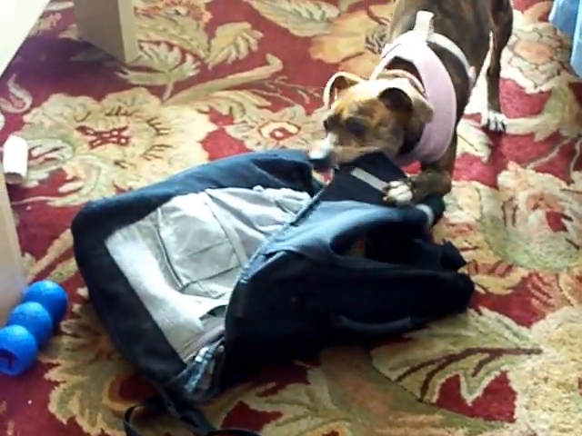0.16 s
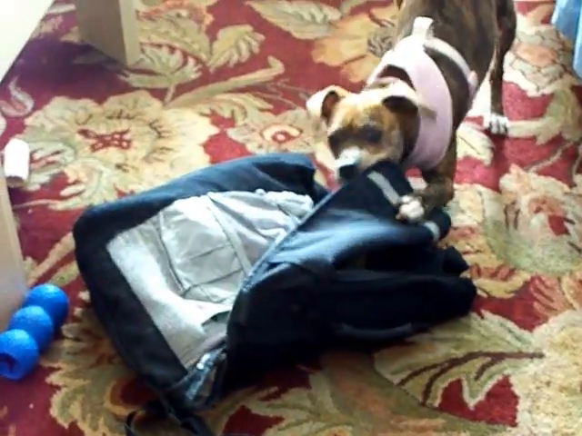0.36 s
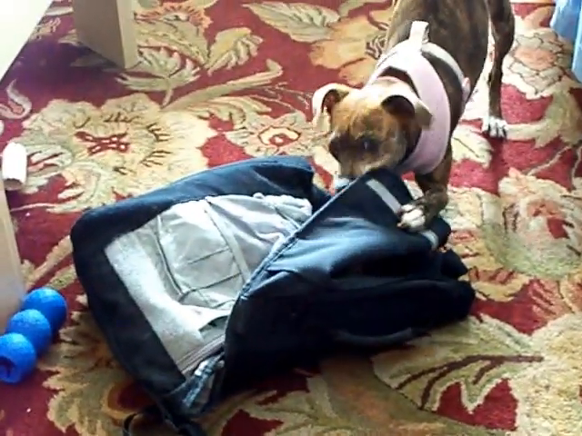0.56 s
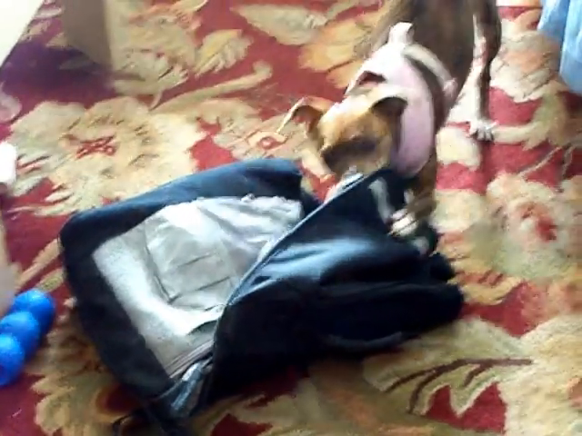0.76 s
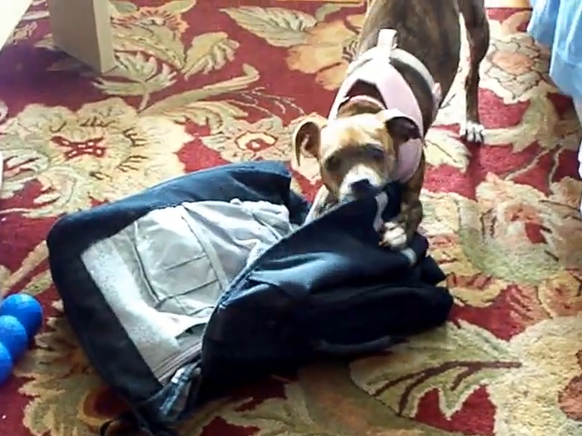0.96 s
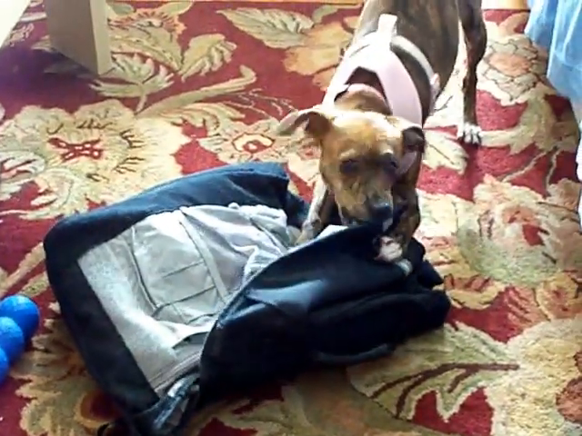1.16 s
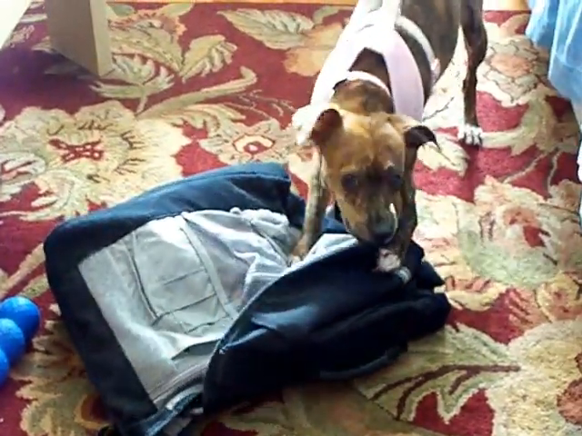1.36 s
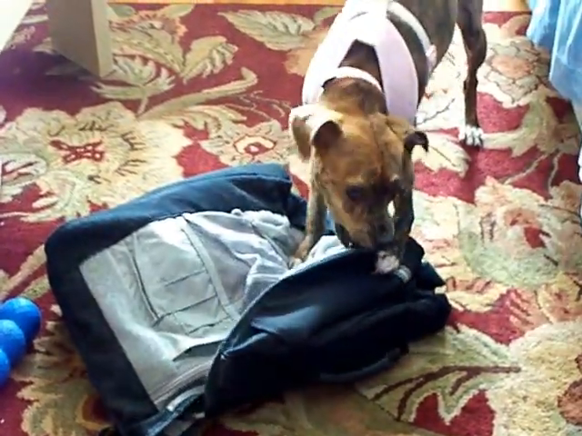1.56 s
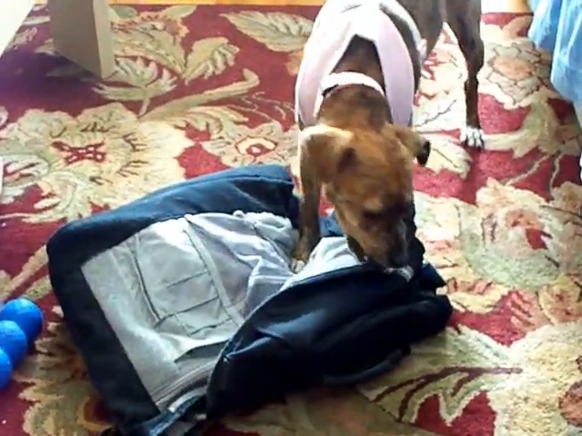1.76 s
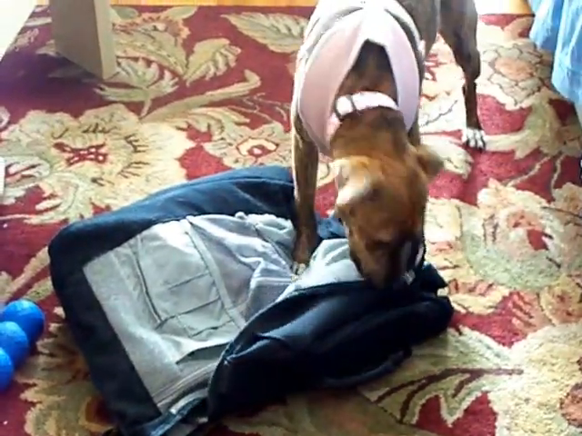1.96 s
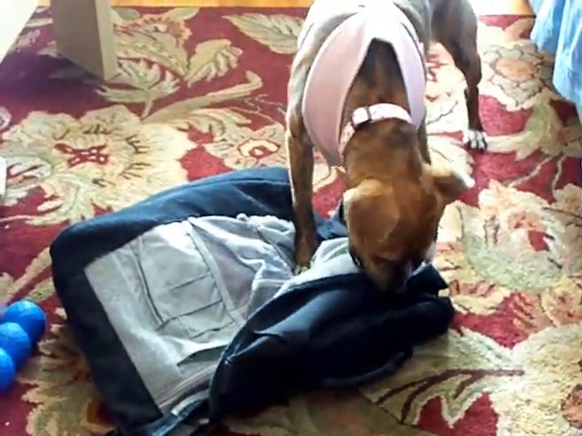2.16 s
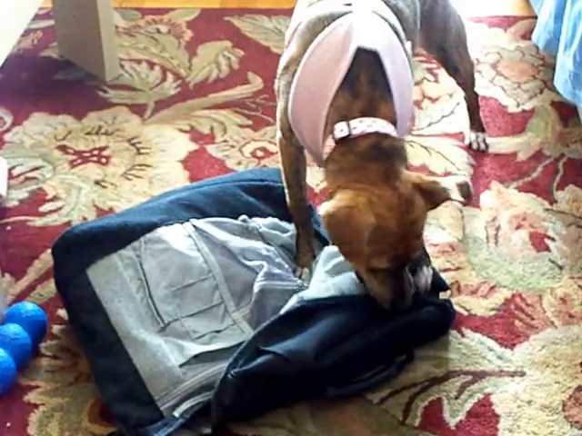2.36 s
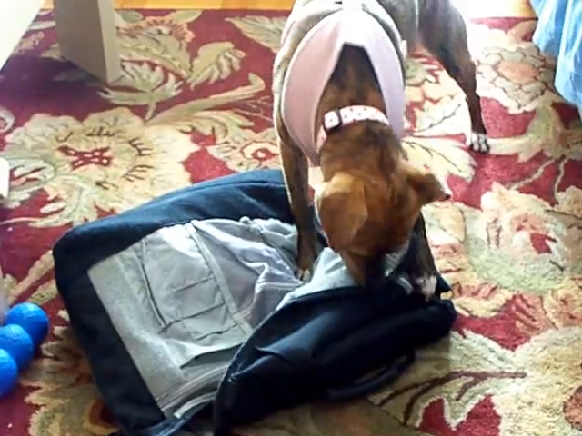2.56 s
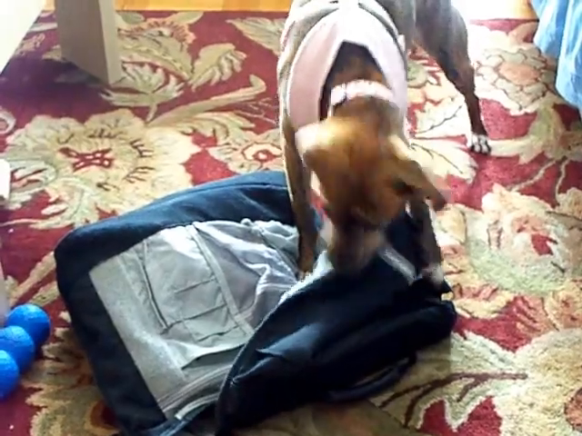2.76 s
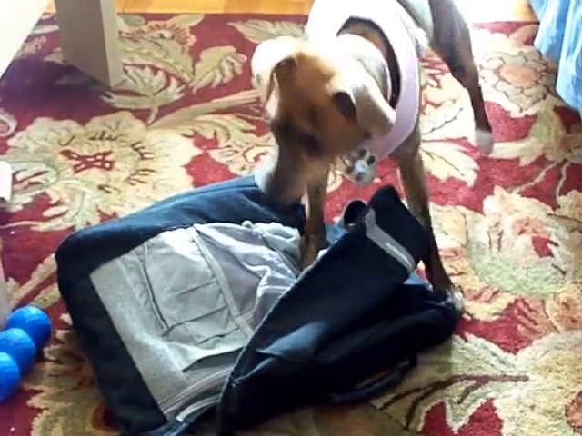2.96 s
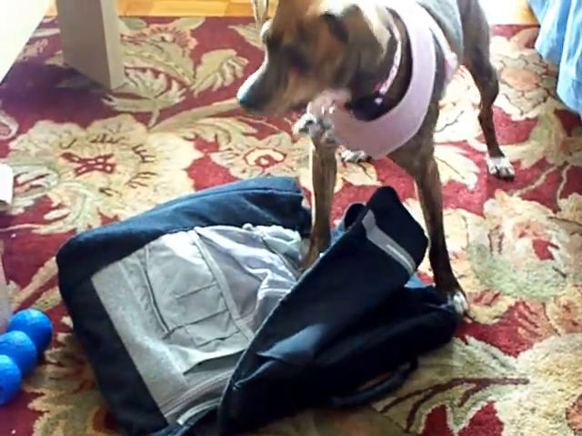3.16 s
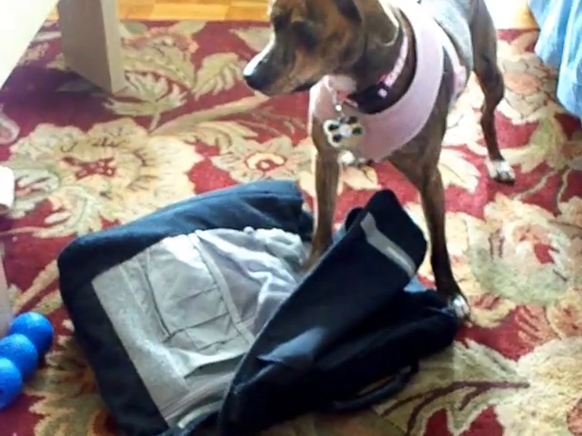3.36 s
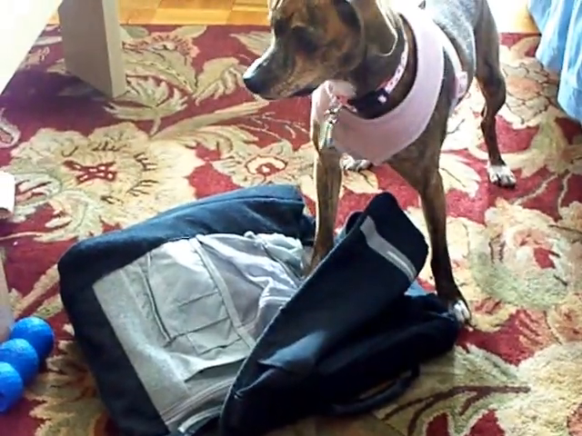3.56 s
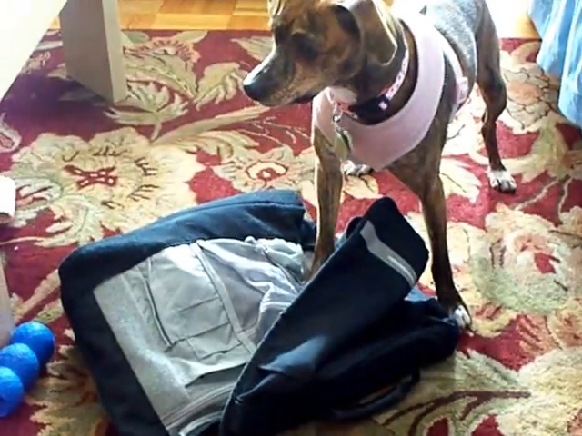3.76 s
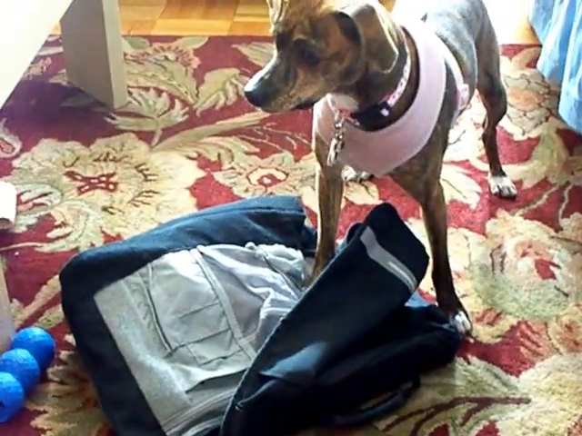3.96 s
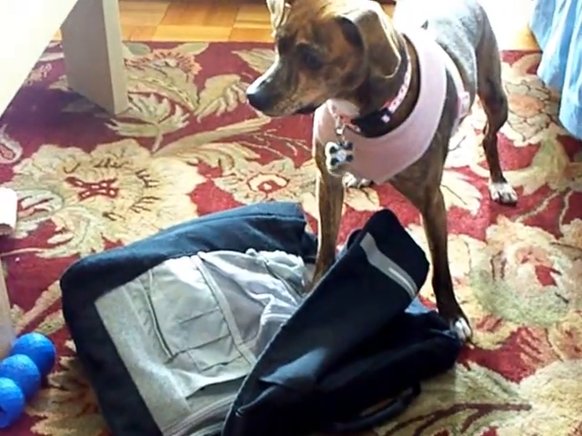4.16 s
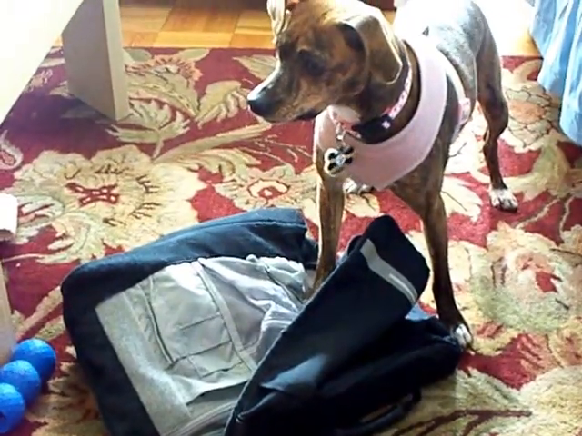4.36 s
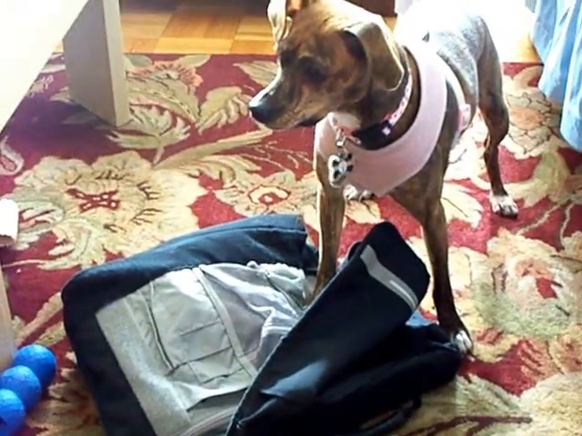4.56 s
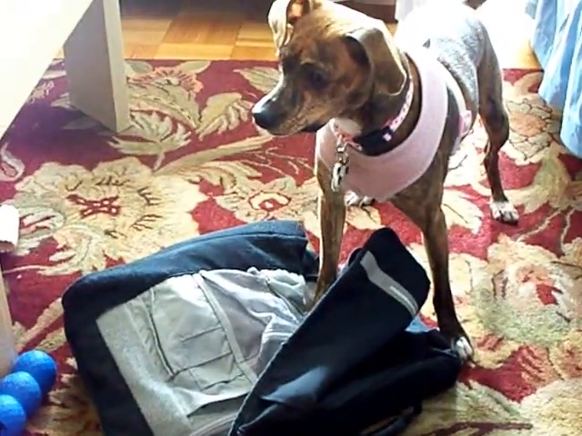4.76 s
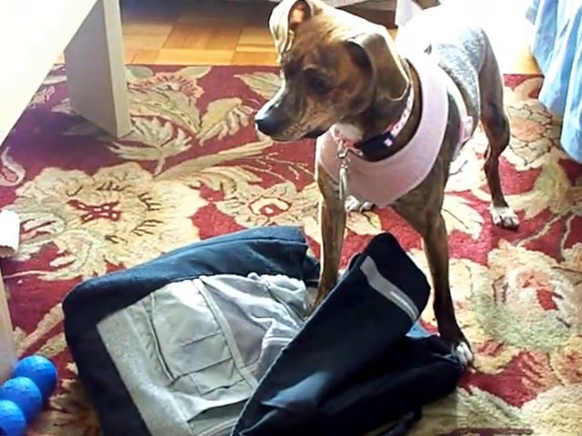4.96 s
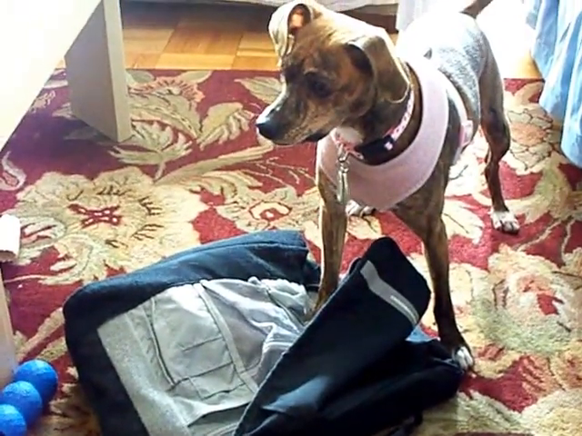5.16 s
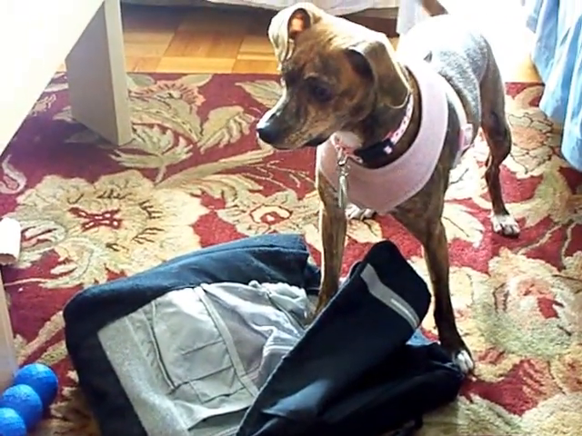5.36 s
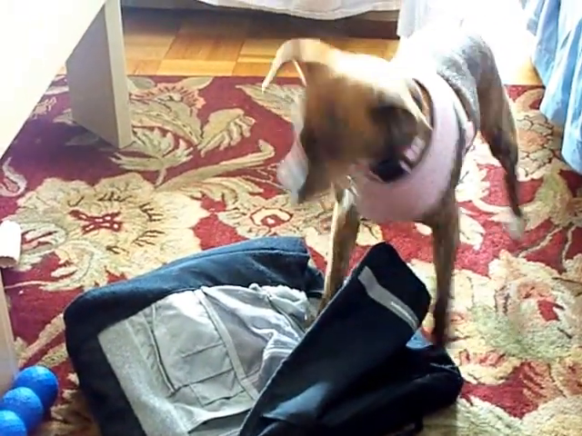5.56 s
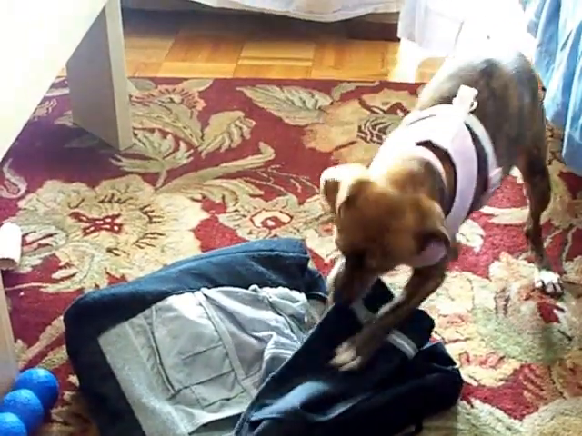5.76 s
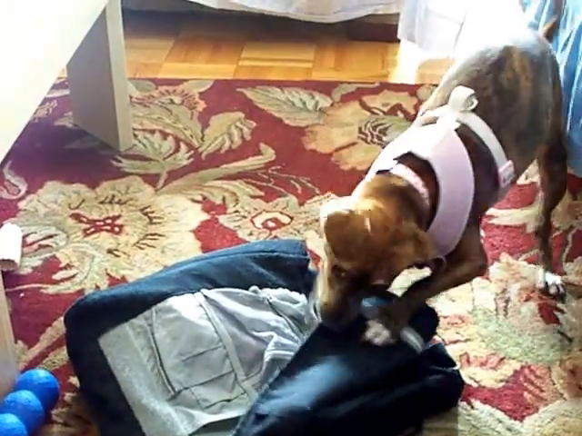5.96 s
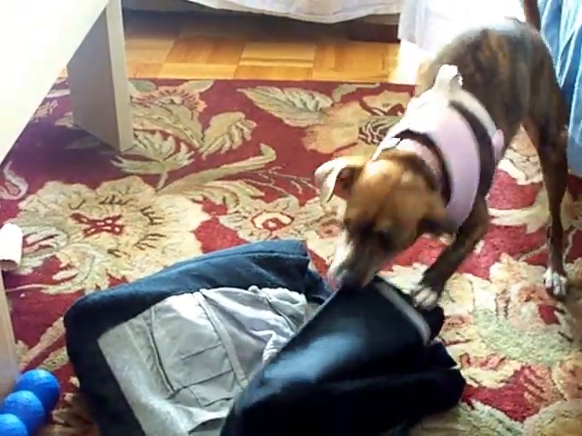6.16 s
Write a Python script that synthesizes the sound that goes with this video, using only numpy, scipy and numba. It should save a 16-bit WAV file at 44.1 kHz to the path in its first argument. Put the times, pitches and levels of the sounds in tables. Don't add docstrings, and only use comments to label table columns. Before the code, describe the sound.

Close to a cheap pocket camera in a small room, a dog nibbles and paws a nylon bag on carpet, with crackling cloth, clicking tags, knocking claws and soft thuds. Midway a door further behind groans and leaps into high squeals, pauses, then closes in short squeaks and a sinking creak. A hard tug and ringing buckle end it over hiss and low thumping.

```python
import sys
import numpy as np
from scipy import signal
from scipy.fft import rfft, irfft, next_fast_len
from scipy.io import wavfile
from scipy.ndimage import uniform_filter1d
from numba import njit

SR = 44100
rng = np.random.default_rng(int(sys.argv[2]) if len(sys.argv) > 2 else 0)


def ratio(d):
    e = np.asarray(d, float) / 20
    return 10 ** e


def generate_wav(sig):
    pcm = np.round(np.clip(np.atleast_2d(sig).T, -1, 1) * 32767).astype(np.int16)
    wavfile.write(sys.argv[1], SR, pcm)


N = 273887
HALF_RATE_HZ = 8000
SETTLE_S = 0.012

# (centre [Hz], width [Hz], level [dB])
DULL_RUB = [(252, 260, 7), (405, 290, 12.5), (710, 396, 10), (914.4, 210, -5.5)]
RUSTLE = [(1460, 1000, 11.8), (1900, 570, 5.2), (2840, 2080, 9.9)]
BRIGHT_CRACKLE = [(5280, 2650, 4), (7200, 2200, 5.5), (7400, 2100, 0)]
# (frequency [Hz], gain [dB])
INLET = [(2500, -1), (3300, -5.5), (3900, -13), (4120, -26), (4230, -29.5), (4400, -16.5), (4700, -9.5),
         (5200, -3.5), (6500, 1.5)]


def unit(x):
    return x / np.sqrt(np.mean(x ** 2) + 1e-30)


def shape_db(points, hz):
    point_hz, point_db = np.array(points).T
    return np.interp(np.log(np.maximum(hz, 1)), np.log(point_hz), point_db)


def colour(x, points):
    size = next_fast_len(len(x))
    hz = np.arange(size // 2 + 1) * SR / size
    return irfft(rfft(x, size) * ratio(shape_db(points, hz)), size)[:len(x)]


def band(hz, centre_hz, width_hz):
    return 1 / (1 + ((hz - centre_hz ** 2 / hz) / width_hz) ** 2) ** 2


def body(x, modes):
    size = next_fast_len(len(x))
    hz = np.arange(1, size // 2 + 2) * SR / size
    power = sum(ratio(db) ** 2 * band(hz, centre_hz, width_hz) for centre_hz, width_hz, db in modes)
    gain = np.sqrt(power) * ratio(shape_db(INLET, hz))
    return unit(irfft(rfft(x, size) * gain, size)[:len(x)])


def walk(rate_hz, size=N):
    hold = int(SR / rate_hz)
    steps = np.repeat(rng.standard_normal(size // hold + 1), hold)
    return 1.41 * uniform_filter1d(uniform_filter1d(steps, hold), hold)[:size]


def ring(hz, t60_s, size):
    t = np.arange(size) / SR
    return np.sin(2 * np.pi * hz * t) * 1000. ** (-t / t60_s) * (1 - np.exp(-t / 0.00079))


def add(out, s, x):
    i = int(s * SR)
    out[i:i + len(x)] += x[:N - i]


def cloth():
    # (time [s], length [s], rustle level [dB], crackle over rustle [dB])
    nibbles = [(0.331, 0.03, -65, -4), (1.11, 0.14, -56.5, -6), (1.316, 0.046, -52.5, -3),
               (1.725, 0.04, -49, 2), (1.784, 0.1, -64, 7), (1.94, 0.096, -58.5, -4),
               (2.04, 0.037, -53, -1.5), (2.228, 0.1, -54.5, -5.5), (3.032, 0.012, -57.5, -3),
               (3.12, 0.049, -53, -5.5), (3.207, 0.031, -53, -4.5), (3.322, 0.018, -57.5, -1)]
    paws = [(0.05, 0.094, -63, -7), (1.393, 0.044, -55, -4.5), (1.459, 0.051, -51.5, -4),
            (1.548, 0.13, -63, -6), (2.297, 0.035, -53, 2), (2.404, 0.038, -49.5, 10.5),
            (2.459, 0.051, -61, 5), (2.522, 0.086, -65, 1.5), (2.65, 0.11, -52, 3.5),
            (2.931, 0.088, -60, -3), (3.081, 0.022, -56.5, 1), (3.703, 0.012, -55, -7.5),
            (5.558, 0.064, -64, -3.5), (5.618, 0.006, -58.5, 7), (5.654, 0.051, -46.5, -6.5),
            (5.823, 0.22, -54, 3), (6.155, 0.049, -48.5, -6.5)]
    drags = [(0.186, 0.13, -69, -1.5), (0.544, 0.099, -70, 0), (2.096, 0.12, -69, -1.5),
             (3.388, 0.025, -57, -22), (3.542, 0.058, -58.5, -4.5), (3.616, 0.096, -71.5, -15),
             (3.758, 0.09, -70.5, -3), (4.273, 0.082, -67, -32), (1.47, 0.045, -64, -8),
             (5.991, 0.038, -47, -8), (6.053, 0.11, -51, -0.3)]
    pulls = [
        (0.913, 0.096, -64.5, -6.5),
        (1.013, 0.08, -65.5, -7.5),
        (1.855, 0.16, -62, 8),
        (2.33, 0.07, -53.5, 3),
        (5.731, 0.075, -49.5, 4.5),
    ]
    # (dull rub over rustle [dB], swell over the stroke [dB])
    kinds = [(nibbles, (-10.5, 0.1)), (paws, (0.9, -1.7)), (drags, (8.1, -3.1)), (pulls, (-1, 7.3))]
    tail_s = 0.098

    clicks = (rng.random(N) < 3000 / SR) * rng.standard_normal(N)
    clicks *= ratio(2.2 * rng.exponential(size=N))
    drive = ratio(1.2 * walk(90)) * (unit(clicks) + rng.standard_normal(N))
    rustle = unit(sum(ratio(mode[2] + 3 * walk(30)) * body(drive, [mode]) for mode in RUSTLE))
    rub = body(drive, DULL_RUB) * ratio(1.5 * walk(40))
    crackle = body(drive, BRIGHT_CRACKLE) * ratio(1.5 * walk(40))

    power = np.zeros((3, N))
    strokes = [tuple(row) + kind for rows, kind in kinds for row in rows]
    for s, length_s, db, crackle_db, rub_db, swell_db in strokes:
        end_s = length_s + tail_s
        t = np.arange(int(end_s * SR)) / SR
        stroke_db = np.interp(t, [0, .005, length_s, end_s], [-30, -swell_db / 2, swell_db / 2, -30])
        for layer, relative_db in zip(power, (0, rub_db, crackle_db)):
            add(layer, s, ratio(db + relative_db + stroke_db) ** 2)
    return np.sum(np.sqrt(power) * [rustle, rub, crackle], axis=0)


def hits():
    # (time [s], peak [dB], ring [Hz], crack over ring [dB])
    clicks = [(0.411, -49, 900, -3), (0.573, -49.5, 1560, -3.5), (1.124, -41, 1580, -7),
              (1.157, -38, 1600, -0.5), (1.337, -36.5, 1240, -3.5), (1.429, -34.5, 1150, -7),
              (1.891, -53.5, 1265, 5), (1.905, -46.5, 2590, 10), (1.936, -33, 1760, 1.5),
              (2.238, -42, 1840, -0.5), (2.266, -35, 1760, -4.5), (2.257, -51, 1900, 6.5),
              (2.367, -44, 1800, 10.5), (2.383, -45.5, 2400, 9.5), (2.419, -43.5, 2180, 8),
              (2.445, -38, 2680, 3), (3.025, -45, 1830, 1.5), (3.08, -42, 2330, 0.6), (3.14, -49, 1240, 1),
              (5.067, -38, 1820, 0.5), (5.087, -44, 1980, 6.5), (5.624, -45.5, 2420, 9),
              (5.733, -39.5, 2130, 10.5), (1.878, -48, 1820, 5.5)]
    knocks = [(0.071, -37, 1270, -14), (0.204, -39.5, 988, -12), (0.26, -38, 1520, -19),
              (0.274, -38.5, 1470, -23), (0.401, -28.5, 1330, -39), (0.602, -44, 1360, -18),
              (0.937, -40, 1280, -22), (1.008, -37, 1500, -9.5), (1.666, -42.5, 1110, -29),
              (1.733, -48.5, 1420, -29.5), (2.299, -25.5, 1030, -21), (3.208, -36.5, 1200, -14),
              (3.326, -38, 1269, -11), (3.403, -35, 1326, -30), (3.702, -32.5, 1150, -20),
              (5.299, -33, 1490, -11), (5.666, -30.5, 1720, -7), (5.675, -21, 1590, -7.5),
              (5.686, -35, 1520, -11), (5.806, -28.5, 1670, -12.5)]
    thuds = [
        (0.349, -44.5, 1240, -8.5),
        (1.055, -41.5, 1240, -12.5),
        (2.163, -43, 1780, -25),
        (2.408, -33.5, 1760, -9),
        (3.543, -44.5, 1230, -6),
        (4.3, -46.5, 880, -32),
        (5.65, -37.5, 900, -14),
        (5.679, -29.5, 1500, -25),
        (6.206, -35, 980, -9.5),
    ]
    buckles = [
        (0.701, -38, 1176, -25.5),
        (1.324, -39, 1370, -7),
        (2.039, -44, 1750, -4),
        (2.939, -44, 1600, -17),
        (5.992, -27, 2050, -25),
        (6.019, -25, 2020, -17),
        (6.149, -36, 1610, -4.5),
    ]
    # (thud over ring [dB], decay t60 [s])
    kinds = [(clicks, (-32, 0.025)), (knocks, (-29.5, 0.019)), (thuds, (-2, 0.029)), (buckles, (-15.5, 0.053))]

    out, size = np.zeros(N), SR // 8
    t = np.arange(size) / SR
    blows = [tuple(row) + kind for rows, kind in kinds for row in rows]
    for s, db, hz, crack_db, thud_db, t60_s in blows:
        noise = rng.standard_normal(size)
        fade = 1000. ** (-t / t60_s)
        neighbour_hz = 1.5 * hz
        knock = 0.91 * ring(hz, 0.77 * t60_s, size)
        knock += 0.41 * ratio(shape_db(INLET, neighbour_hz)) * ring(neighbour_hz, 0.83 * t60_s, size)
        knock += 0.16 * body(noise, RUSTLE) * fade
        crack = 0.84 * body(noise, BRIGHT_CRACKLE) * fade ** 1.9
        thud = ring(287, 0.045, size) + 0.65 * ring(540, 0.02, size)
        add(out, s, ratio(db) * (knock + ratio(crack_db) * crack + ratio(thud_db) * thud))
    return out


def hinge(squeals, grip):
    # (frequency [Hz], gain [dB])
    panel = [(600, 3), (1200, -2.5), (1800, 0.5), (2600, 1.5), (3200, 2), (5000, 1), (7000, 0.6)]
    uneven, second_db, fall_db, follow, scrape_db = grip
    flutter_db = 1.23 + 80 * uneven
    out = np.zeros(N)
    for rows in squeals:
        s, hz, db = np.transpose(rows)
        t = np.arange(s[0], s[-1], 1 / SR)
        hz, db = np.interp(t, s, hz), np.interp(t, s, db)
        peak_db = db.max()
        waver = uneven + 0.0082 * np.exp(-(t - s[0]) / SETTLE_S)
        phase = 2 * np.pi * np.cumsum(hz * (1 + waver * walk(300, len(t)))) / SR

        overtone_db = peak_db + follow * (db - peak_db) + second_db
        partials = [db] + [overtone_db + fall_db * k for k in range(11)]
        tone = np.zeros(len(t))
        for k, partial_db in enumerate(partials, 1):
            heard_db = partial_db + shape_db(INLET, k * hz) + shape_db(panel, k * hz)
            level = np.sqrt(2) * ratio(heard_db + flutter_db * walk(123.3, len(t)))
            tone += level * np.sin(k * phase) * (k * hz < HALF_RATE_HZ)

        gated_noise = (1 + np.cos(phase)) * rng.standard_normal(len(t))
        scrape = body(gated_noise, DULL_RUB + RUSTLE + BRIGHT_CRACKLE)
        scrape *= ratio(scrape_db + (db + peak_db) / 2)
        edge = np.minimum(np.minimum(t - s[0], s[-1] - t) / 0.00089, 1)
        add(out, s[0], edge * (tone + scrape))
    return out


def jerks(rows, fade_db_s):
    catch_s = 0.004
    for s, length_s, first_hz, settled_hz, db in rows:
        t = np.arange(0, length_s, .001)
        hz = settled_hz + (first_hz - settled_hz) * np.exp(-t / SETTLE_S)
        drop_db = np.maximum(6 * (1 - t / catch_s), fade_db_s * (t - catch_s))
        yield np.c_[s + t, hz, db - drop_db]


def door():
    # (time [s], slip rate [Hz], level [dB])
    groan = [
        (2.603, 627, -63),
        (2.62, 674, -52),
        (2.67, 675, -50),
        (2.7, 672, -55),
        (2.735, 722, -55),
    ]
    squeals = [
        [(2.735, 2660, -39), (2.77, 2677, -47.5), (2.795, 2905, -40.5)],
        [(2.795, 3425, -49), (2.81, 3422, -43.5), (2.822, 3620, -38)],
    ]
    whistles = [
        [(2.822, 3670, -42), (2.87, 3790, -42.5), (2.9, 3747, -38.5), (2.94, 3810, -47), (2.96, 3800, -62),
         (3.015, 3860, -50.5)],
        [(3.018, 4020, -52.5), (3.04, 3906, -48), (3.09, 3863, -38), (3.16, 3890, -50), (3.21, 3823, -44.5),
         (3.26, 3874, -53), (3.35, 4010, -54.5), (3.42, 4010, -61), (3.48, 4030, -69)],
    ]
    lower_squeals = [
        [(2.72, 3030, -56), (2.75, 2960, -43), (2.78, 2946, -60.5), (2.805, 2944, -33.5), (2.83, 3260, -60)],
        [(3.155, 1136, -48.5), (3.18, 1157, -38), (3.197, 1214, -42.5), (3.225, 1191, -35.5),
         (3.3, 1221, -44.5), (3.33, 1259, -40), (3.398, 1240, -57)],
    ]
    # (time [s], length [s], first slip rate [Hz], settled slip rate [Hz], level [dB])
    squeaks = [
        (4.25, .08, 1930, 2190, -53),
        (4.45, .08, 3540, 3680, -58.5),
        (4.897, .02, 2490, 1980, -50),
        (5.072, 0.059, 1884, 2086, -48),
    ]
    chirps = [
        (4.545, 0.034, 3376, 3320, -45),
        (4.748, 0.2, 2945, 2505, -43.5),
    ]
    whine_jerk = [
        (4.915, .153, 1977, 1705, -47),
    ]
    last_jerk = [
        (5.213, 0.13, 1660, 1598, -55),
    ]
    # (time [s], slip rate [Hz], level [dB])
    slide = [
        (5.11, 2030, -50),
        (5.142, 1944, -64.5),
        (5.21, 1820, -54),
    ]
    last_swing = [
        (5.3, 1480, -51),
        (5.35, 1252, -49),
        (5.39, 1144, -52.5),
        (5.425, 944, -53),
        (5.475, 725, -60.5),
        (5.51, 628, -66.5),
    ]
    # (unevenness of the slips [ratio], second partial [dB],
    # fall of each further partial [dB], share of level swings the overtones follow [ratio], scrape [dB])
    grips = dict(groan=(0.0216, -1.5, -0.77, -0.4, 4.5), squeal=(0.0135, -9, -21, 0.8, -12),
             whistle=(0.0063, -10, -20, 1.4, -24), lower=(0.0076, -18, -25, 1.2, -46),
             squeak=(0.0172, -12.5, -11.5, 0.7, -21), chirp=(0.0078, -9, -6, 0.3, -29),
             whine=(0.011, 1.6, -4.5, 0.7, -20.5), last=(0.0044, 7, -7.5, 0.2, -13.5),
             swing=(0.0216, 1.5, -3.5, 1.5, -5.5))

    opening = hinge([groan], grips["groan"]) + hinge(squeals, grips["squeal"])
    opening += hinge(whistles, grips["whistle"]) + hinge(lower_squeals, grips["lower"])
    closing = hinge([*jerks(squeaks, 201), slide], grips["squeak"])
    closing += hinge(jerks(chirps, 292), grips["chirp"])
    closing += hinge(jerks(whine_jerk, 15), grips["whine"])
    closing += hinge(jerks(last_jerk, 15), grips["last"])
    closing += hinge([last_swing], grips["swing"])
    return opening + closing


@njit
def walls(x, lags, gain, damp):
    line, soft, out = np.zeros((8, 4096)), np.zeros(8), np.zeros(len(x))
    for i in range(len(x)):
        total = 0.
        for k in range(8):
            soft[k] += (1 - damp) * (gain[k] * line[k, (i - lags[k]) & 4095] - soft[k])
            total += soft[k]
        out[i] = soft[0] - soft[1] + soft[2] - soft[3] + soft[4] - soft[5]
        for k in range(8):
            line[k, i & 4095] = x[i] + soft[k] - total / 4
    return out


def room(bag, far_door):
    t60_s, bag_db, door_db = 0.43, -19, -9.5
    lags = np.array([613, 797, 1021, 1213, 1471, 1709, 1979, 2311])
    sent = ratio(bag_db) * bag + ratio(door_db) * far_door + 1e-18
    return walls(sent, lags, ratio(-60 * lags / SR / t60_s), .38)


def camera():
    # (frequency [Hz], density [dB per Hz])
    hiss_shape = [(25, -17.5), (40, -21), (80, -4.5), (150, -7.5), (290, 2), (480, -1.5), (850, -4),
                  (1300, -7), (2400, -13.5), (3400, -15), (5500, -17.5), (8000, -20.5)]
    # (frequency [Hz], rms level [dB])
    whine = [(59.2, -77), (7828, -73)]
    # (offset [s], ring [Hz], decay t60 [s], peak [dB])
    thumps = [
        (.0593, 261.5, 0.028, -43.5),
        (0.0926, 228, 0.026, -44.5),
    ]
    # (time [s], shift [s])
    clock_slips = [
        (5.0, -.016),
        (5.3, -0.0074),
    ]

    hiss = unit(colour(colour(rng.standard_normal(N), hiss_shape), INLET))
    out = hiss * ratio(-58 + walk(8))
    t = np.arange(N) / SR
    for hz, db in whine:
        out += np.sqrt(2) * ratio(db + 0.5 * walk(6.6)) * np.sin(2 * np.pi * hz * t)
    ticks = np.arange(int(N / SR * 10)) / 10
    for offset_s, hz, t60_s, db in thumps:
        for tick in ticks:
            late, strength, pitch = rng.standard_normal(3)
            s = tick + offset_s
            s += sum(shift_s for at, shift_s in clock_slips if s > at) + 0.0012 * late
            add(out, s, ratio(db + 3.5 * strength) * ring(hz * (1 + .1 * pitch), t60_s, SR // 20))
    return out


def scene():
    bag, far_door = cloth() + hits(), door()
    return (bag + ratio(-2.5) * far_door + room(bag, far_door) + camera())[None]


def low_pass(x):
    return signal.sosfilt(signal.butter(12, 10130, fs=SR, output="sos"), x)


def record(dry):
    # (frequency [Hz], gain [dB])
    mirror = [(7000, 0.5), (8000, -4), (8600, -10), (9200, -18.5), (9800, -31.5), (10300, -39)]
    size = (N // SR + 1) * SR
    spectrum, fold = rfft(dry[0], size), HALF_RATE_HZ * size // SR
    spectrum[fold + 1:] = 0
    spectrum[fold + 1:fold + fold // 2] = np.conj(spectrum[fold - 1:fold - fold // 2:-1])
    wide = colour(irfft(spectrum, size)[:N], mirror)
    return low_pass(wide[None])


dry = scene()
out = record(dry)
generate_wav(out)
```